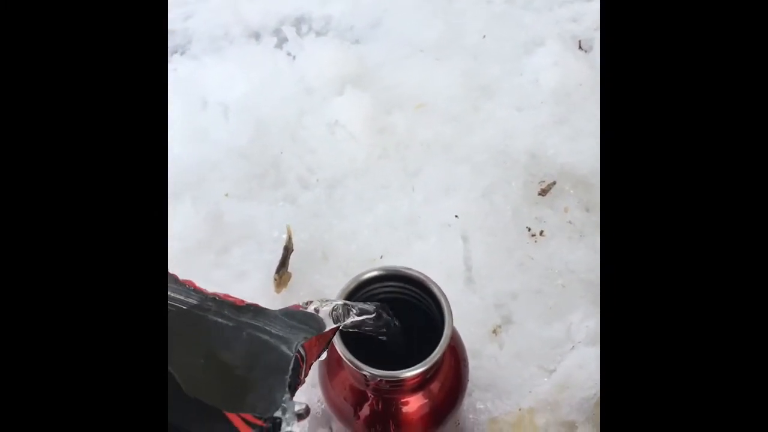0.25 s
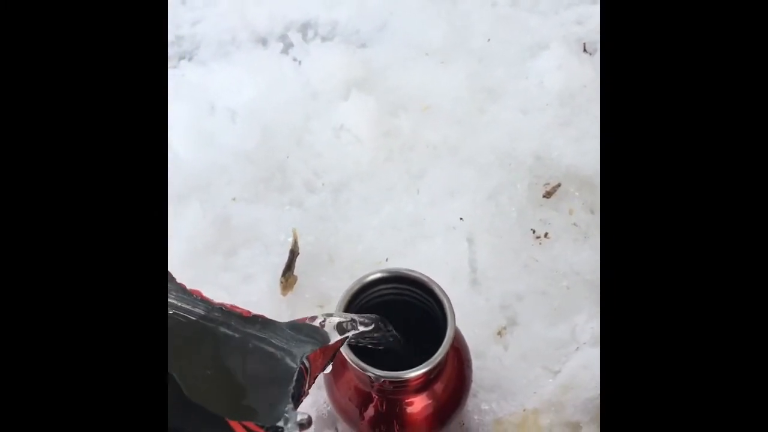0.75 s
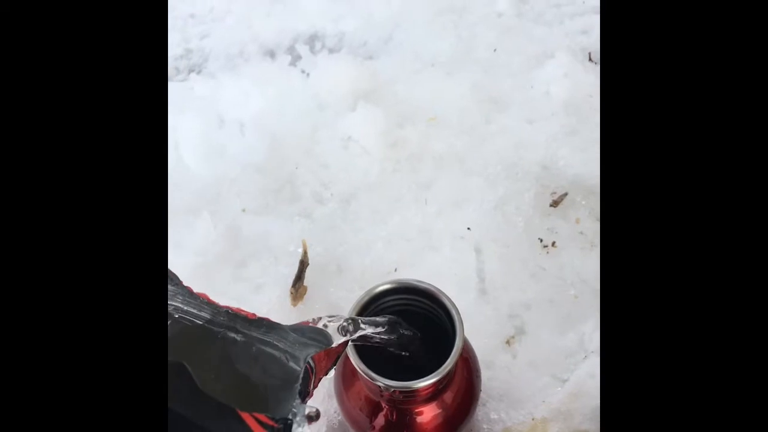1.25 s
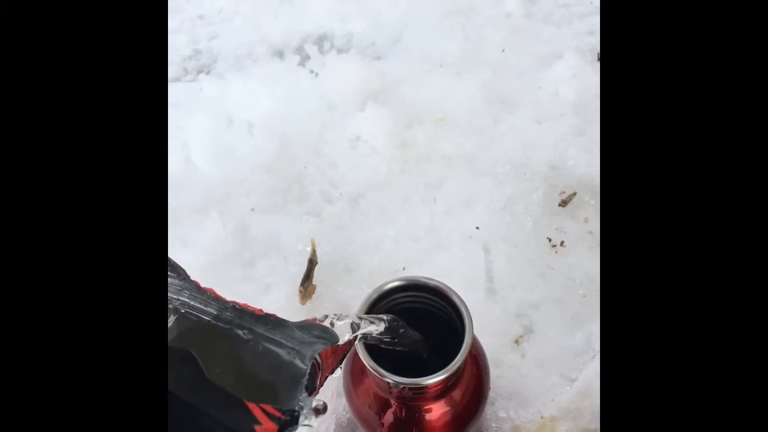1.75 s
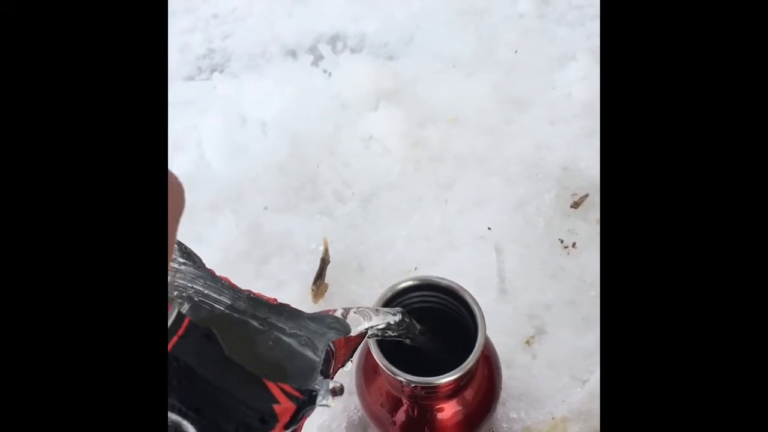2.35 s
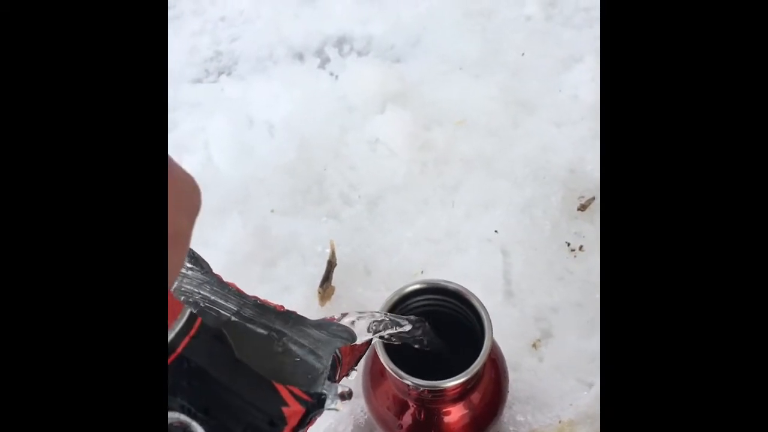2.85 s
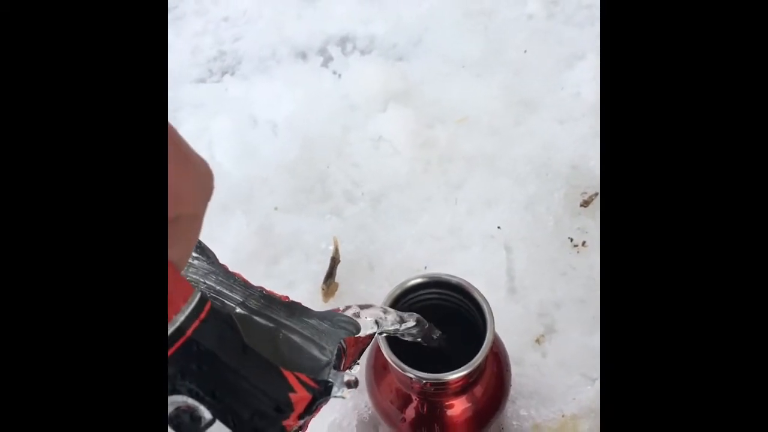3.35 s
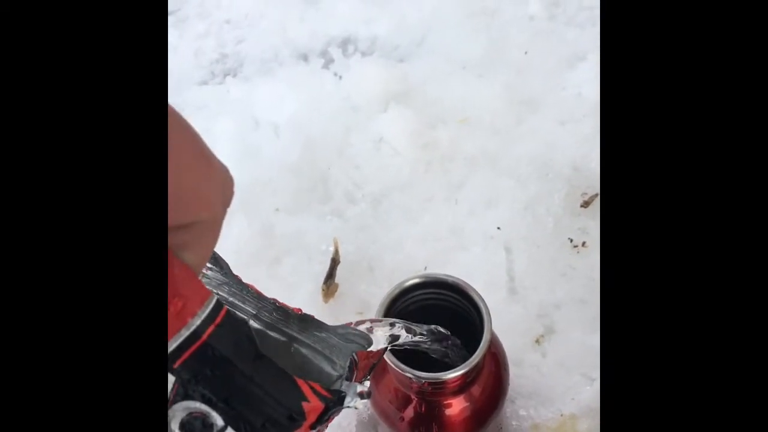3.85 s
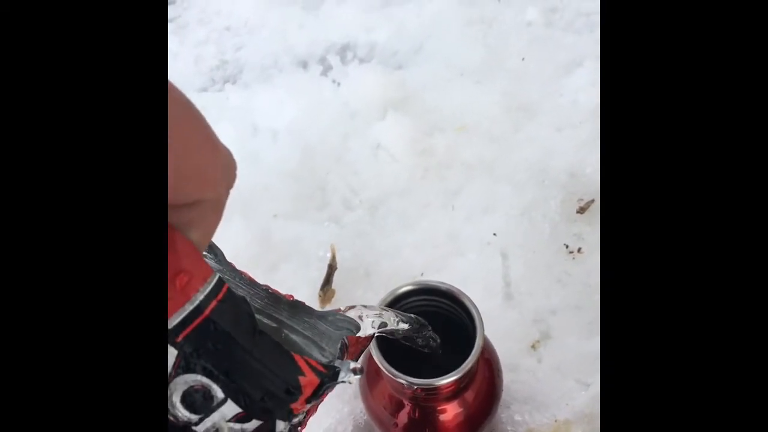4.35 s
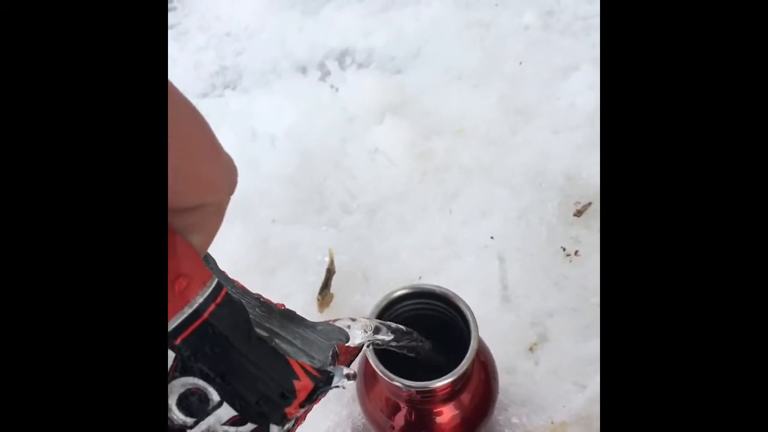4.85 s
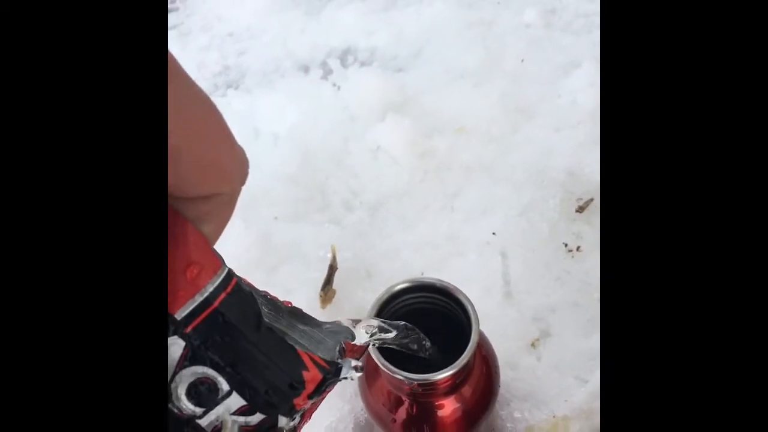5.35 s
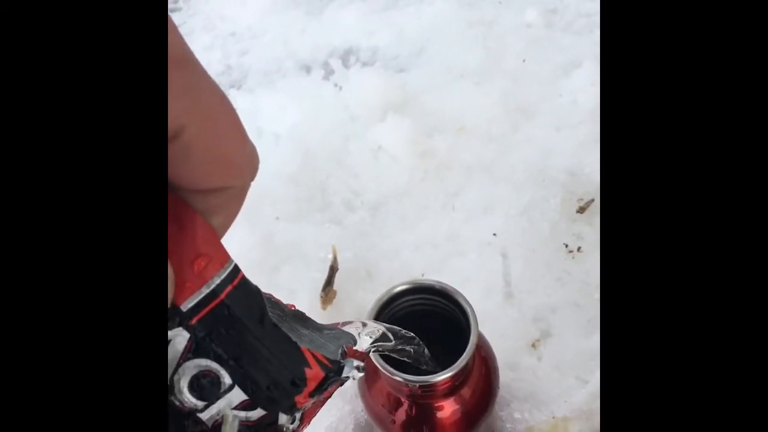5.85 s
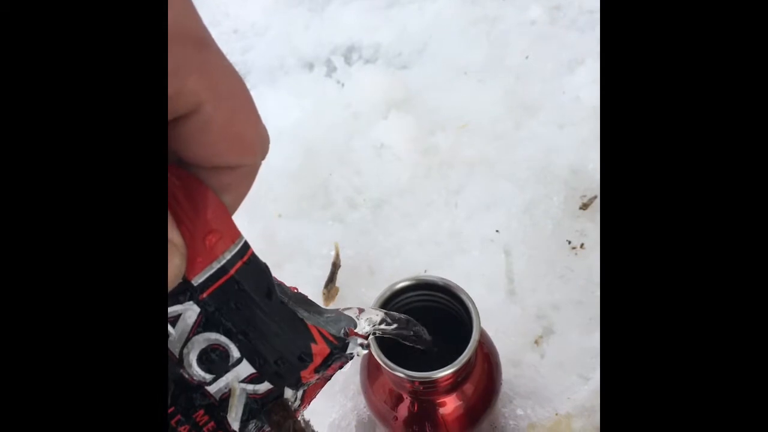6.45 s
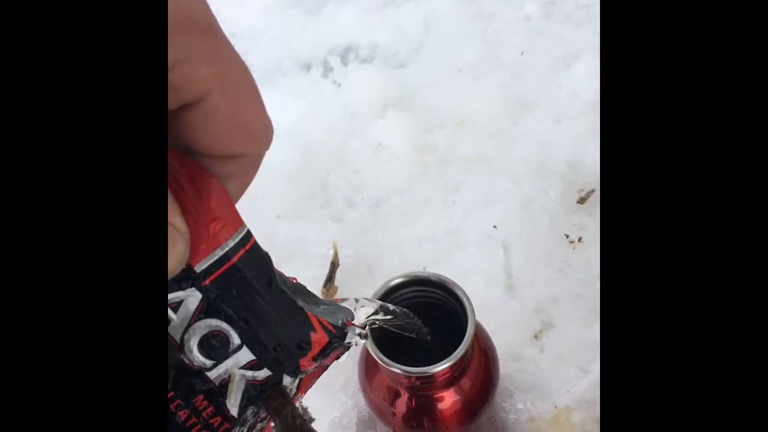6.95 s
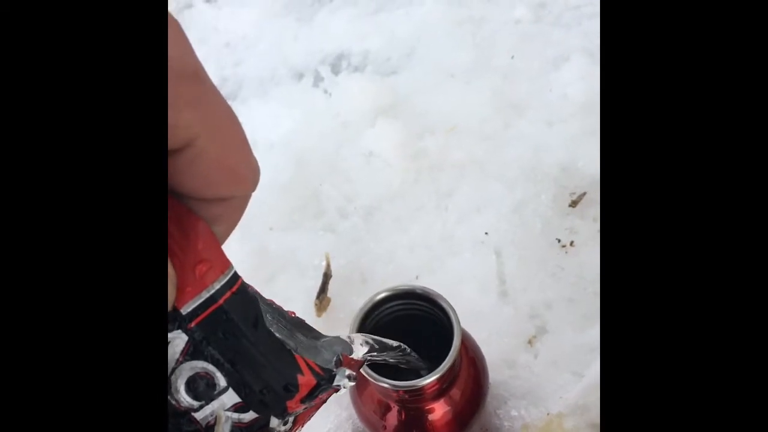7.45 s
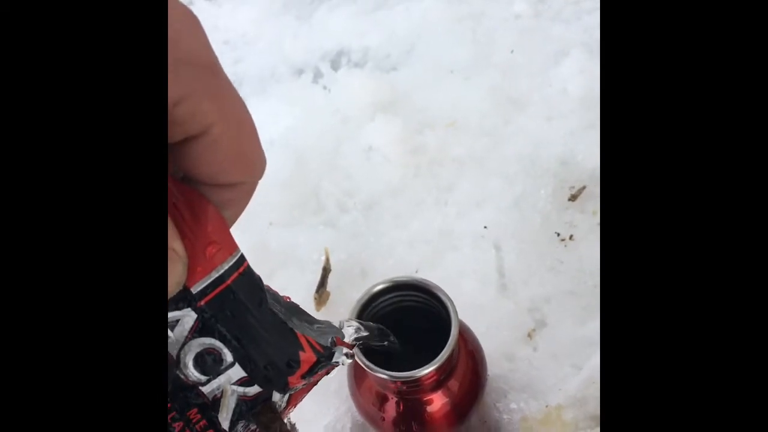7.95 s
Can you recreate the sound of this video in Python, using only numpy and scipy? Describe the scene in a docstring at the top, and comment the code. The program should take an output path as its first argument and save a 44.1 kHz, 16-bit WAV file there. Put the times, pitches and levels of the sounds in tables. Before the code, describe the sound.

Outdoors, wind buffets a close microphone in low, uneven gusts while water runs without a break into a metal bottle. The bright, fizzy trickle is mixed with bubbling, stray drips and occasional hollow gulps, and its tone rises gradually as the bottle fills. Toward the end the stream thins a little and the plastic pouch it comes from gives a few short crackles, the last one loudest.

```python
"""Pouring water into a steel bottle outdoors

A thin stream of water runs from a plastic pouch into a steel bottle standing in snow.
Droplets and bubbles, made of short noise bursts, excite the bottle's echo and ringing; most of its air
resonances climb as it fills. Plinks and gulps are damped sines, and the pouch snaps a few times.
Gusts of wind, made of filtered noise, buffet the close microphone over a quiet outdoor hush.
"""
import sys
import numpy as np
from scipy import signal
from scipy.fft import rfft, irfft, next_fast_len
from scipy.io import wavfile
from scipy.ndimage import uniform_filter1d, map_coordinates

SR = 44100
rng = np.random.default_rng(int(sys.argv[2]) if len(sys.argv) > 2 else 0)


def output_pcm(signal):
    """Save a mono or channel-first signal as 16-bit PCM at the path in sys.argv[1].

    Samples are clipped to [-1, 1] before scaling.
    """
    pcm = np.clip(np.atleast_2d(signal).T, -1, 1) * 32767
    wavfile.write(sys.argv[1], SR, np.round(pcm).astype(np.int16))


N = 361179  # length in samples
TOP_HZ = 15950  # upper limit of the sound


def amp(db):
    """Turn decibels into gain."""
    return 10 ** (np.asarray(db) / 20)


def unit(x):
    """Scale to rms 1."""
    return x / np.sqrt(np.mean(x ** 2) + 1e-20)


def steady(x, span):
    """Even out the level to about rms 1 over stretches of span seconds."""
    size = max(int(span * SR), 2)
    power = uniform_filter1d(uniform_filter1d(x ** 2, size), size)
    return x / np.sqrt(np.abs(power) + 1e-12)


def curves(rows):
    """Draw straight lines between rows: one curve for each column after the time."""
    s, *columns = np.transpose(rows)
    return [np.interp(np.arange(N) / SR, s, column) for column in columns]


def wobble(rate):
    """A smooth random curve through rate random points a second."""
    points = rng.standard_normal(N // 16)
    return map_coordinates(points, [np.arange(N) * rate / SR], mode="wrap")


def colour(x, points):
    """Filter to the gains of (Hz, dB) points, with no sound ahead of its cause."""
    size = 2 * next_fast_len(N // 2 + 4096)
    hz, db = np.transpose(points)
    bins_hz = np.fft.rfftfreq(size, 1 / SR)
    gain_db = np.interp(np.log(bins_hz + 1), np.log(hz), db)
    # folding the cepstrum onto positive times makes the filter minimum phase
    cepstrum = irfft(np.log(amp(gain_db)))
    cepstrum[1:size // 2] *= 2
    cepstrum[size // 2 + 1:] = 0
    return irfft(rfft(x, size) * np.exp(rfft(cepstrum)))[:N]


def noise(points):
    """Noise of rms 1 with the given spectrum."""
    return unit(colour(rng.standard_normal(N), points))


def place(times, sounds):
    """Add rows of short sounds together at their start times."""
    starts = (np.asarray(times) * SR).astype(int)
    index = starts[:, None] + np.arange(sounds.shape[1])
    return np.bincount(np.abs(index).ravel(), sounds.ravel(), N)[:N]


def glide(start_hz, middle_hz, end_hz):
    """A smooth pitch curve through three points, as the air space shrinks."""
    curve = np.polyfit([0, .5, 1], [start_hz, middle_hz, end_hz], 2)
    return np.polyval(curve, np.arange(N) / N)


def resonate(x, hz, width_hz):
    """A moving resonance with gain 1 at its centre."""
    # shift the centre down to 0 Hz, smooth, then shift back up
    turn = np.exp(2j * np.pi * np.cumsum(hz) / SR)
    keep = np.exp(-np.pi * width_hz / SR)
    return 2 * np.real(turn * signal.lfilter([1 - keep], [1, -keep], x / turn))


def bubbles(hz, cycles, attack, rise=0, size=1100):
    """One damped sine per row; its pitch climbs by the share rise while it dies away."""
    t = np.arange(size) / SR
    turns = t * hz[:, None]
    fade = np.exp(-turns / cycles)
    phase = 2 * np.pi * (turns + rise * (turns - cycles * (1 - fade)))
    return np.sin(phase) * fade * (1 - np.exp(-t / attack))


def splats(hz, width_hz, spray_db, life, attack, size=800):
    """One splat per row: a cluster of tiny bubbles around one pitch, in broad spray."""
    t = np.arange(size) / SR
    real, imag, spray = rng.standard_normal((3, len(hz), size))
    spread = signal.lfilter(*signal.butter(2, width_hz / SR), real + 1j * imag)
    cluster = unit(np.real(spread * np.exp(2j * np.pi * hz[:, None] * t)))
    envelope = np.exp(-t / life[:, None]) * (1 - np.exp(-t / attack))
    return (cluster + amp(spray_db) * spray) * envelope


def burst(count, life, attack, size=1100):
    """One short burst of noise per row."""
    t = np.arange(size) / SR
    return rng.standard_normal((count, size)) * np.exp(-t / life) * (1 - np.exp(-t / attack))


# How strongly the water splashes as the hand tips the pouch; the gurgle follows it too.
# Each row: time in seconds, relative level in dB.
SPLASH_LEVEL = [(0.0, -41.5), (0.6, -47.5), (0.9, -43), (1.4, -44.5), (1.7, -41), (2.2, -46), (2.55, -42.5),
                (2.95, -44), (3.5, -40), (4.1, -48.5), (4.35, -40), (4.65, -50), (4.95, -40), (5.3, -49),
                (5.6, -41.5), (6.0, -48), (6.5, -49), (6.9, -47), (7.45, -46.5), (8.19, -52.5)]


def trickle(centre_hz=8600, octaves=.55, count=1750):
    """The stream breaks into droplets of varied pitch and strength, sparser as the stream thins."""
    turn = (np.arange(count) + rng.uniform(0, 5, count)) / count
    fill = turn - .3 * turn * (1 - turn)
    when = fill * N / SR
    hz = centre_hz * 2 ** (octaves * np.clip(rng.standard_normal(count), -2, 2))
    hz = np.where(hz > TOP_HZ, hz / 2, hz)
    # with less air above the water, the drops are shorter and stand further apart in strength
    life = .003 * (1 - .45 * fill) * np.sqrt(centre_hz / hz)
    size_db = 7.4 * (1 + .35 * fill) * np.clip(rng.standard_normal(count), -3, 2.1)
    sounds = splats(hz, width_hz=1300, spray_db=-2, life=life, attack=.0005)
    strength = amp(size_db) * np.sqrt(hz / centre_hz)
    drops = place(when, sounds * strength[:, None])
    # the stream lands in lumps, more distinct as the fall shortens, over a fine fizz that thins out
    lumps_db = np.linspace(2.3, 4.2, N)
    fizz_db = np.linspace(-18, -24, N)
    fizzy = unit(drops) + amp(fizz_db) * rng.standard_normal(N)
    lumpy = steady(fizzy * amp(lumps_db * wobble(26)), .16)
    return amp(curves(SPLASH_LEVEL)[0] + 1.34) * lumpy


# How much air the stream drags under.
# Each row: time in seconds, bubble level relative to the splashing in dB, before a fixed boost.
DRAGGED_AIR = [(0, -9.5), (1, -9.5), (2.1, -10), (3.6, -13.5), (4.35, -10), (5.4, -9), (8.19, -7)]


def gurgle(centre_hz=3500, octaves=0.72, count=3100):
    """Air dragged under breaks into clumps of larger bubbles, whose short plips blend into a gurgle."""
    when = rng.uniform(0, N / SR, count)
    hz = centre_hz * 2 ** (octaves * np.clip(rng.standard_normal(count), -2, 2))
    strength = amp(5.1 * np.clip(rng.standard_normal(count), -2, 2)) * np.sqrt(hz)
    # larger bubbles ring longer
    life = .0027 * np.sqrt(centre_hz / hz)
    plips = splats(hz, width_hz=600, spray_db=-13, life=life, attack=.0008)
    clumps = place(when, plips * strength[:, None]) * amp(3.1 * wobble(22))
    level_db = curves(SPLASH_LEVEL)[0] + curves(DRAGGED_AIR)[0] + 6.5
    return amp(level_db) * steady(clumps, 0.44)


# Big drops that splat inside the bottle.
# Each row: start in seconds, relative level in dB, pitch in Hz of the bubble they trap.
BIG_DROPS = [(0.077, -19.5, 10650), (0.819, -23.5, 6560), (0.846, -19.5, 8900), (1.073, -24, 6000),
             (1.222, -26.5, 3030), (1.627, -25, 3580), (2.8015, -18, 5760), (3.1902, -21, 5490),
             (3.2995, -24, 6500), (3.859, -27.5, 4270), (4.872, -23, 11240), (4.9009, -21.5, 7140),
             (5.143, -22.5, 11000), (5.391, -19.5, 13100), (5.886, -23, 9900), (5.907, -22, 7700),
             (6.124, -23, 5870), (6.187, -19, 12600), (7.373, -22, 9100), (7.4127, -19, 10200),
             (7.961, -14.5, 10400)]


def big_drops(life_s=0.0027, shortening=0.5):
    """Heavier drops slap the surface, ever more briefly as the bottle fills."""
    s, db, hz = np.transpose(BIG_DROPS)
    life = life_s * (1 - shortening * s * SR / N)
    slaps = splats(hz, width_hz=1900, spray_db=-3, life=life, attack=.00025)
    return place(s, slaps * amp(db - 1)[:, None])


def air_mode(x, rocking, start_hz, middle_hz, end_hz, width_hz):
    """One air resonance comes and goes as the stream wanders; the further it climbs, the broader and weaker."""
    fill = np.arange(N) / N
    drive = x * steady(amp(3.2 * wobble(16)), .2)
    hz = glide(start_hz, middle_hz, end_hz) * rocking
    climb = end_hz / start_hz
    early = resonate(drive, hz, width_hz)
    late = resonate(drive, hz, width_hz * climb ** 2)
    return (1 - fill) * early + fill / climb * late


# Resonances of the air in the bottle; the first is the neck's, which the gulps also sound.
# Each row: pitch in Hz at the start, halfway and at the end, width at the start in Hz, relative level in dB.
AIR_MODES = [(360, 432, 592, 28, 11), (1486, 2015, 2890, 29, 15), (3137, 3600, 4680, 47, 4),
             (4680, 4460, 4600, 82, -0.5), (6110, 5400, 6900, 144, -3.5)]
# Ringing of the steel wall. Each row: pitch in Hz, width in Hz, level at the start in dB.
WALL_MODES = [(1820, 16, 7), (2744, 35, 12)]


def bottle(x, echo_db=-6, echo_t60=0.038, fade_db=-8, slosh=0.0065, count=14, size=3000):
    """Steel walls throw the splash back and forth; the echo changes and weakens as the water climbs."""
    fill = np.arange(N) / N
    t = np.arange(size) / SR
    echo = np.zeros(N)
    # crossfade through a series of random echo tails
    for k in range(count):
        tail = rng.standard_normal(size) * amp(-60 * t / echo_t60)
        share = np.sqrt(np.clip(1 - np.abs(fill * (count - 1) - k), 0, 1))
        echo += signal.oaconvolve(x * share, tail / np.linalg.norm(tail))[:N]
    # the surface rocks, so the resonances waver
    rocking = 1 + slosh * wobble(13)
    modes = sum(amp(db) * air_mode(x, rocking, *shape) for *shape, db in AIR_MODES)
    # the rising water damps the wall
    ringing = sum(amp(db) * resonate(x, np.full(N, hz), width) for hz, width, db in WALL_MODES)
    wall = (1 - fill) * ringing
    return amp(-7.5) * x + amp(echo_db + fade_db * fill) * echo + amp(4.5 - 11.7 * fill) * modes + wall


# Single clear bubbles. Each row: start in seconds, relative level in dB, starting pitch in Hz.
PLINK_BUBBLES = [(0.109, -25, 2500), (0.432, -27.5, 1480), (0.939, -18, 4400), (1.695, -26, 3750),
                 (2.385, -26, 1730), (3.7326, -18.5, 4900), (4.3216, -28.5, 2010), (4.926, -30, 2250),
                 (7.736, -21, 3100), (7.84, -29, 3760), (8.005, -22, 6300)]


def plinks(cycles=10.4, attack=0.00046, rise=0.052):
    """Single bubbles ring as damped sines, rising a little in pitch as they surface."""
    s, db, hz = np.transpose(PLINK_BUBBLES)
    return place(s, bubbles(hz, cycles, attack, rise) * amp(db - 4.0)[:, None])


POCKET_GAP_S, NECK_RING_S = 0.024, 0.012  # average gap between air pockets; decay time of each
NECK_SAG = 0.067  # each pocket starts this share sharp
# Gulps of trapped air that sound the neck.
# Each row: start in seconds, time in seconds in which its run of pockets dies away, relative level in dB.
AIR_GULPS = [(3.333, 0.047, -25), (4.29, 0.038, -31.5), (4.73, 0.041, -36.5), (4.955, 0.56, -40),
             (5.469, 0.12, -33.5), (5.9, 0.035, -32.5), (6.19, 0.09, -36), (7.66, 0.069, -38.5)]


def gulps(churn_db=-38, wet_db=-10, count=5, size=4000):
    """Pockets of air close one after another; each rings the air in the neck, over a soft wet churning."""
    neck_hz = glide(*AIR_MODES[0][:3])
    t = np.arange(size) / SR
    envelope = np.exp(-t / NECK_RING_S) * (1 - np.exp(-t / .001))
    rings = np.zeros(N)
    for s, length, db in AIR_GULPS:
        # the first pocket is on time, the others a little uneven
        uneven = rng.uniform(-.2, .2, count) * (np.arange(count) > 0)
        delay = POCKET_GAP_S * (np.arange(count) + uneven)
        hz = neck_hz[int(s * SR)] * (1 + .02 * rng.standard_normal((count, 1)))
        turns = hz * (t + NECK_SAG * NECK_RING_S * (1 - np.exp(-t / NECK_RING_S)))
        strength = amp(db) * np.exp(-delay / length)
        rings += place(s + delay, np.sin(2 * np.pi * turns) * envelope * strength[:, None])
    churn = amp(churn_db + 4 * wobble(16)) * rng.standard_normal(N)
    hum = resonate(resonate(churn, neck_hz, width_hz=60), neck_hz, width_hz=170)
    # each pocket also splashes a little as it closes
    splash = unit(resonate(rng.standard_normal(N), 2 * neck_hz, width_hz=700))
    wet = uniform_filter1d(np.abs(rings), SR // 100) * splash
    return rings + hum + amp(wet_db) * wet


# Creases of the pouch snapping over.
# Each row: start in seconds, relative level in dB, pitch in Hz, crack relative to the swing in dB.
POUCH_SNAPS = [(2.158, -41, 1510, 6), (6.057, -32.5, 1240, 4), (6.336, -38, 2250, 8),
               (6.671, -34, 1010, 3.5), (7.0841, -24.5, 920, 5.5), (7.3087, -11.5, 1300, -9)]


def pouch():
    """Stiff foil flips: one damped swing, a crack and a faint rustle."""
    s, db, hz, crack_db = np.transpose(POUCH_SNAPS)
    swing = bubbles(hz, cycles=1.34, attack=.0001)
    crack = burst(len(s), life=0.0023, attack=.0001)
    rustle = amp(-25) * burst(len(s), life=0.0077, attack=0.003)
    snaps = (swing + amp(crack_db)[:, None] * (crack + rustle)) * amp(db)[:, None]
    return colour(place(s, snaps), [(400, 0.0), (1000, 7.5), (4000, 6.0), (14000, -11.0)])


GUST_EDGE_DB = 10.5  # how far below its height a gust begins and ends
# The breeze between the gusts. Each row: time in seconds, relative level in dB.
BREEZE_LEVEL = [(0.0, -32.5), (1.2, -37), (1.35, -45.5), (2.4, -38), (3.15, -31.5), (3.55, -46), (4.7, -60),
                (4.9, -35.5), (5.48, -86), (5.85, -34.5), (6.28, -44), (6.7, -34), (7.65, -36), (8.0, -78),
                (8.19, -25.5)]
# Gusts that swell and die away. Each row: time of its height in seconds, length in seconds, relative level in dB.
WIND_GUSTS = [(0.302, 0.33, -31), (0.551, 0.24, -23), (0.911, 0.18, -20.5), (1.12, 0.15, -24),
              (1.563, 0.086, -26.5), (1.951, 0.21, -21), (2.103, 0.04, -19), (2.294, 0.13, -22),
              (2.52, 0.2, -23.5), (2.872, 0.1, -20), (3.023, 0.14, -21), (3.754, 0.23, -22),
              (3.963, 0.28, -26.5), (4.271, 0.11, -30), (4.39, 0.13, -24.5), (4.545, 0.24, -28),
              (4.809, 0.11, -27.5), (5.18, 0.27, -34.5), (5.689, 0.16, -25), (6.195, 0.056, -29),
              (6.642, 0.2, -25), (6.895, 0.26, -25.5), (7.126, 0.059, -23), (7.219, 0.081, -22),
              (7.468, 0.2, -20), (7.648, 0.042, -24.5), (7.827, 0.21, -24.5), (8.079, 0.06, -22.5)]


def wind_strength():
    """Level of the wind in dB: each gust rises and falls in an arch above the breeze."""
    t = np.arange(N) / SR
    power = amp(curves(BREEZE_LEVEL)[0]) ** 2
    for s, length, db in WIND_GUSTS:
        near = np.abs(t - s) < 2 * length
        arch_db = db - GUST_EDGE_DB * (2 * (t[near] - s) / length) ** 2
        power[near] += amp(arch_db) ** 2
    return 10 * np.log10(power)


# The hardest buffets of the gusts. Each row: start in seconds, relative level in dB.
HARD_BUFFETS = [(0.022, -19.5), (0.514, -19), (0.552, -11.5), (0.601, -13), (0.921, -16), (1.937, -13),
                (1.99, -8.5), (2.245, -20.5), (2.534, -19), (2.859, -13), (2.911, -12), (2.96, -17.5),
                (3.019, -26), (3.144, -21.5), (3.784, -15), (4.046, -16.5), (4.366, -25.5), (5.679, -30),
                (6.887, -18.5), (7.372, -17.5), (7.427, -19), (7.457, -14.5), (7.487, -13.5)]
# Spectrum of their thumps. Each row: frequency in Hz, relative level in dB.
THUMP_SPECTRUM = [(60, -25), (200, 15), (550, 9.5), (1200, -25), (3000, -72), (8000, -70)]
# Band in which a hard buffet rasps: lower and upper edge in Hz.
RASP_BAND = (770, 1410)


def buffets(life=0.0045, attack=0.0021, rasp_db=2, size=1500):
    """The hardest eddies strike the microphone as short rough thumps; the harder the push, the more it rasps."""
    s, db = np.transpose(HARD_BUFFETS)
    t = np.arange(size) / SR
    shape = np.exp(-t / life) * (1 - np.exp(-t / attack))
    push = place(s, shape * amp(db + 4.5)[:, None])
    band = signal.butter(2, RASP_BAND, "bandpass", fs=SR, output="sos")
    rasp = unit(signal.sosfilt(band, rng.standard_normal(N)))
    return push * steady(noise(THUMP_SPECTRUM), 0.011) + amp(rasp_db) * push ** 2 * rasp


# Spectrum of the wind's deep rumble. Each row: frequency in Hz, relative level in dB.
RUMBLE_SPECTRUM = [(15, -73), (30, -10), (58, 1), (100, -5), (160, -10.5), (250, -24), (500, -59.5),
                   (1200, -103)]
# Spectrum of its flutter. Each row: frequency in Hz, relative level in dB.
FLUTTER_SPECTRUM = [(60, -30), (160, 7), (300, -2), (520, -12), (750, -24), (1200, -41), (2200, -59),
                    (6000, -65)]


def wind(flutter_db=-24.0, steepness=1.87):
    """Gusts push on the microphone in lumps; small eddies flutter, growing faster than the gust itself."""
    gust_db = wind_strength()
    lumps = steady(amp(3.8 * wobble(32)), .06)
    rumble = amp(gust_db + 2.27) * lumps * steady(noise(RUMBLE_SPECTRUM), 0.055)
    eddies = lumps * steady(noise(FLUTTER_SPECTRUM) * amp(7.6 * wobble(120)), 0.03)
    # steepness: dB of flutter for each dB of gust
    eddy_db = flutter_db + steepness * (gust_db + 22.5)
    return rumble + amp(eddy_db) * eddies + buffets()


# Spectrum of the open air. Each row: frequency in Hz, relative level in dB.
HUSH_SPECTRUM = [(20, -27), (60, 16), (250, -6), (1000, -5.5), (2000, -21), (15000, -44)]


def hush():
    """The open air is a quiet, steady noise."""
    return amp(-50.0) * noise(HUSH_SPECTRUM)


# Tone of the splashing before it enters the bottle. Each row: frequency in Hz, gain in dB.
SPRAY_SPECTRUM = [(200, -40), (600, 1.5), (1050, 4), (1600, -7), (2200, -6.5), (3300, 0), (5000, -5),
                  (6500, 0), (9000, 1), (10400, -1.5), (12000, 3), (15800, -1.5)]


def scene():
    """Water in the bottle, pouch, wind and the hush of the open air."""
    splashing = colour(trickle() + gurgle() + big_drops(), SPRAY_SPECTRUM)
    water = bottle(splashing) + plinks() + gulps()
    return (water + pouch() + wind() + hush())[None]


def record(dry):
    """The recorder weakens the deepest bass and keeps nothing above its band limit."""
    thin = signal.sosfilt(signal.butter(2, 38, "highpass", fs=SR, output="sos"), dry)
    size = next_fast_len(N + 4096)
    kept = np.fft.rfftfreq(size, 1 / SR) < TOP_HZ
    return irfft(rfft(thin, size) * kept, size)[:, :N]


dry = scene()
out = record(dry)
output_pcm(out)
```